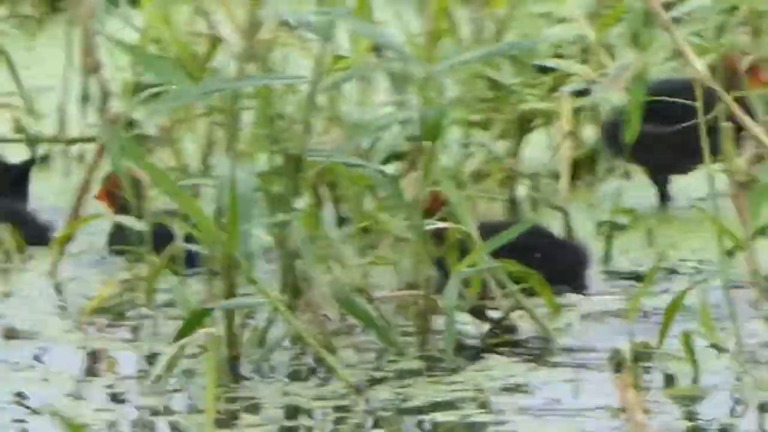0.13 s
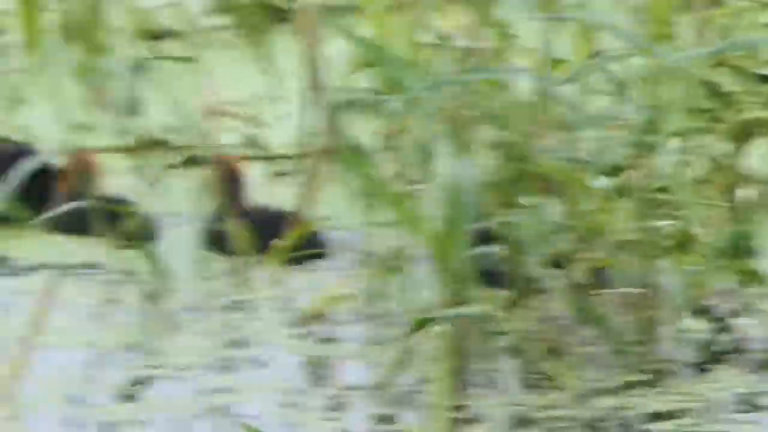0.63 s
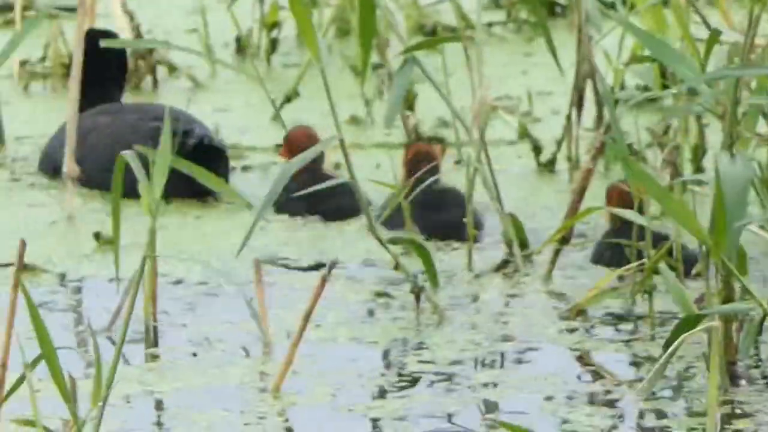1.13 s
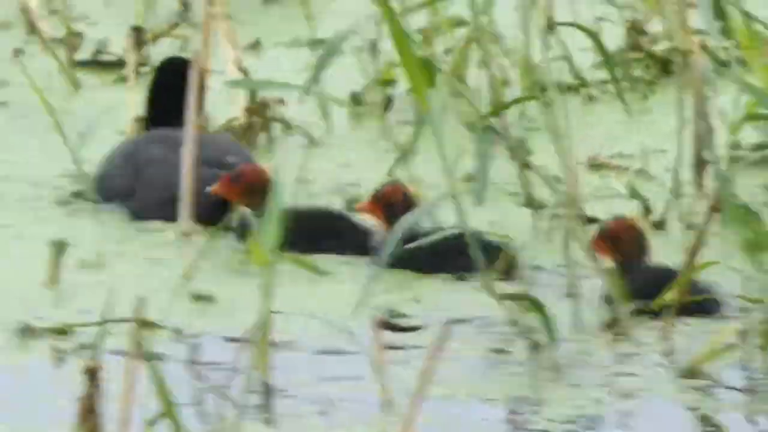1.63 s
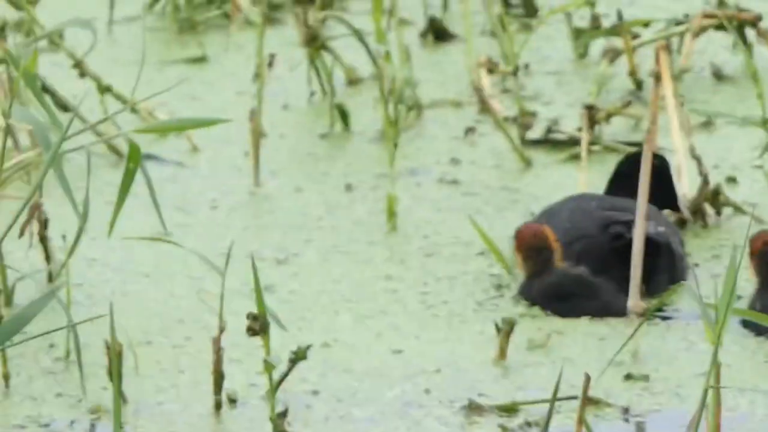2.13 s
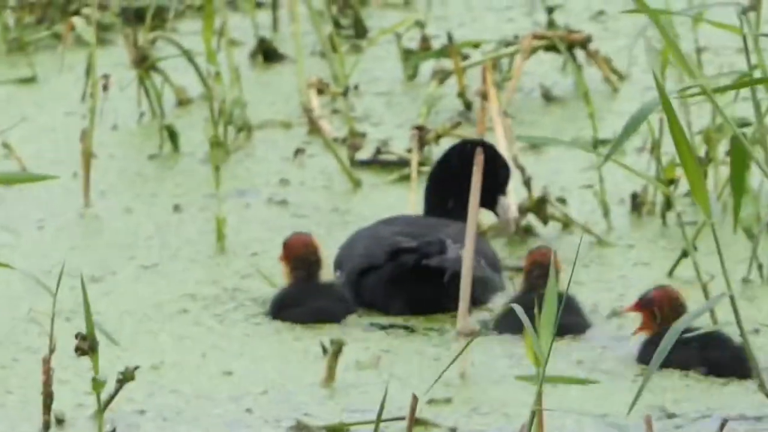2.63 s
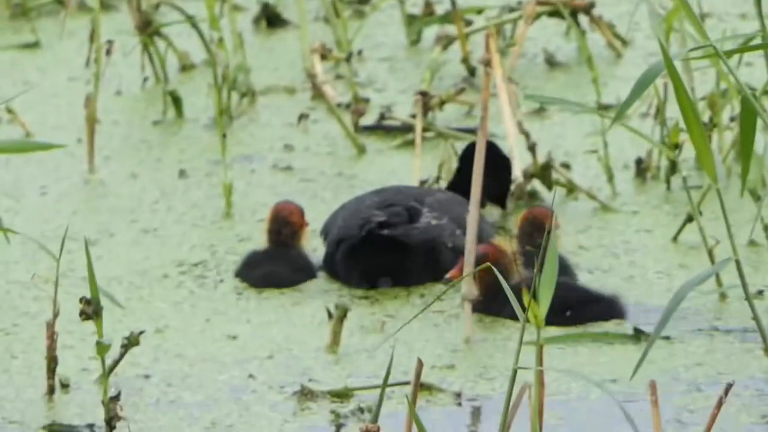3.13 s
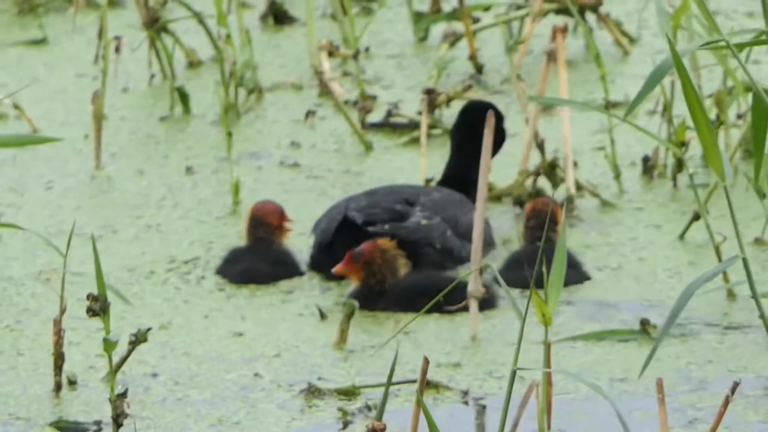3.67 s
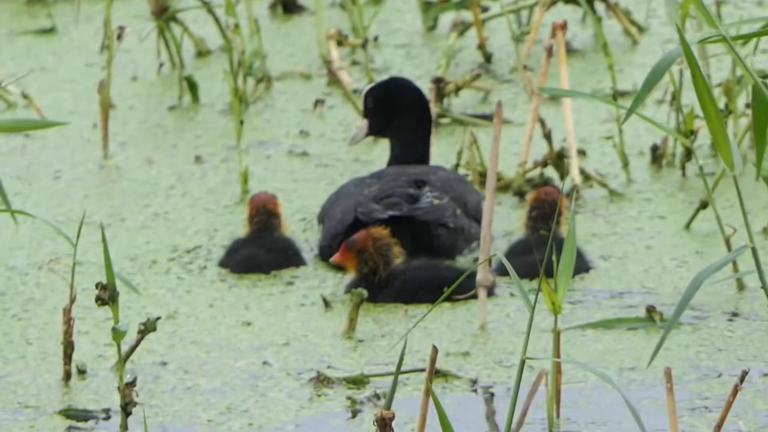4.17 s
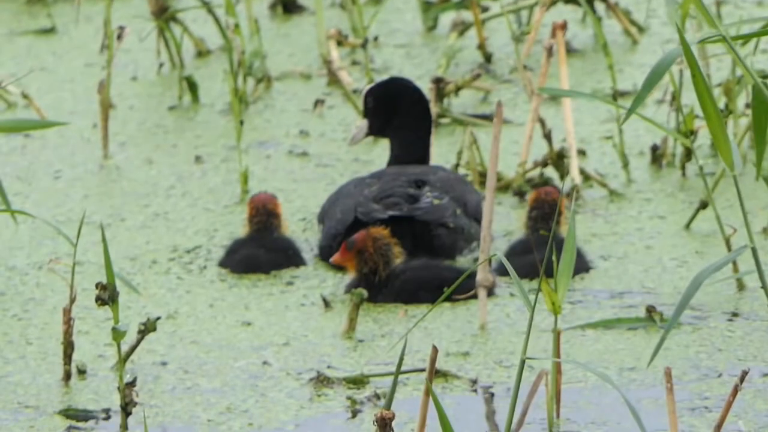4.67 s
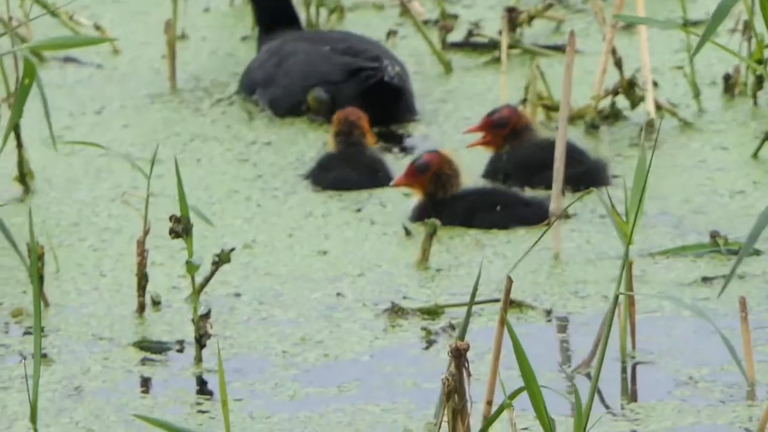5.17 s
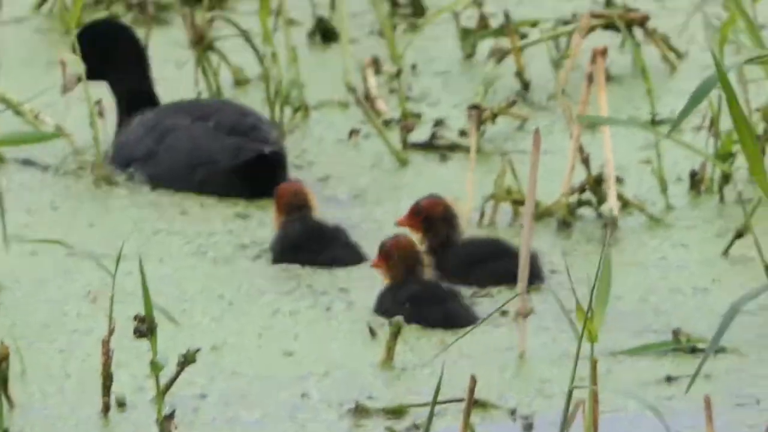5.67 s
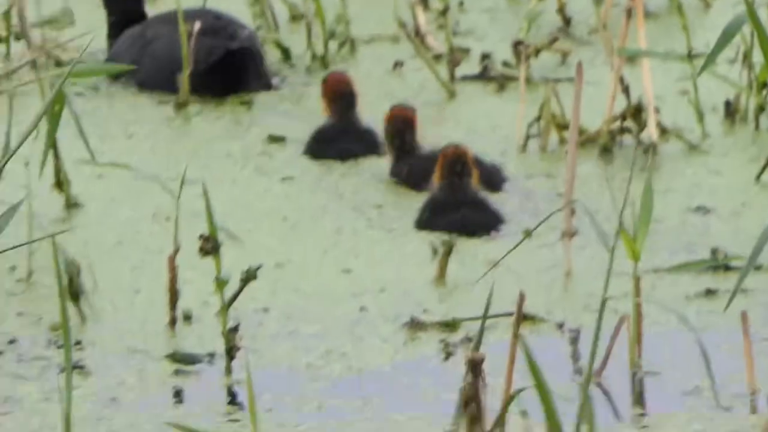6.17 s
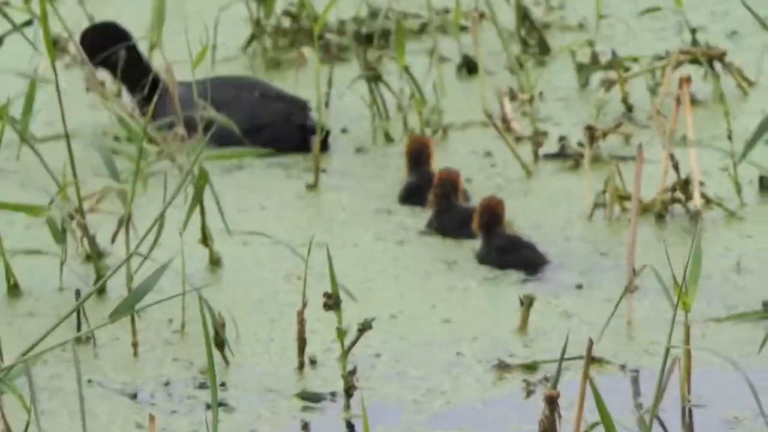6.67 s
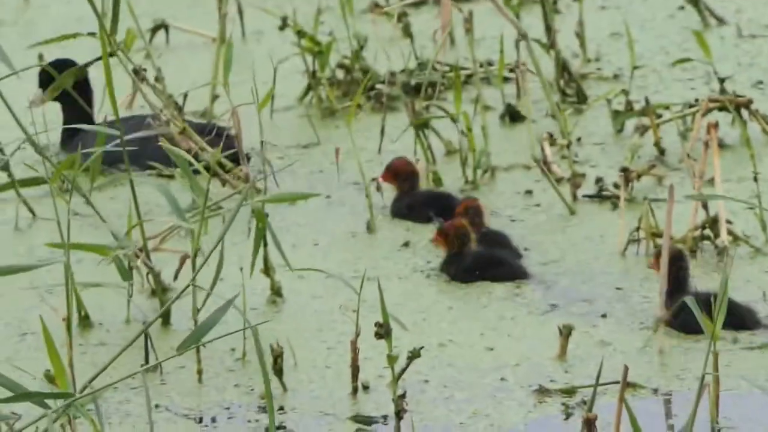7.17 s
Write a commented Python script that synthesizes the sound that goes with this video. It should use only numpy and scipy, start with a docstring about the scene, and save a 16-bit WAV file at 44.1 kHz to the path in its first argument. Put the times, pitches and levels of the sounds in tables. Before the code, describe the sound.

A dull, distant roar with light hiss and a thin wavering hum fills an open wetland. Small clicks come at 0.3 s and faint hoarse peeps at 0.5 and 0.7 s. A soft grunt and a clear arching chick whistle with a reedy undertone follow around 1.0-1.3 s, then another grunt at 1.6 s. Thinner, wavering cheeps come at 2.0-2.3 s and a brighter, rougher one at 2.7-3.1 s. Low rumble swells near 3.35 s. Reedy calls, a short whistle, a grunt and a tick cluster at 3.8-4.2 s. Sound cuts out at 4.2 s, leaving only minute crackles, and returns with a click at 4.95 s. Strong high whistles sound at about 5.3-5.6 and 5.8-6.0 s, with the loudest sharp click at 5.84 s. Weak peeps and a faint reedy call trail to 6.9 s; a tick at 7.0 s and one last faint cheep end it.

```python
"""A dull distant roar with a faint hum is heard first: shaped noise and a wavering sine.
Waterbird chicks then cheep among reeds: near-sine whistles arch up and down, reedier calls stack partials.
Short noise bursts click and tick now and then; soft grunts are noise through narrow resonances.
The sound is muted for most of a second, leaving a settling offset and runs of tiny spikes,
then fades back in with a click."""
import sys
import numpy as np
from scipy import signal
from scipy.io import wavfile
from scipy.ndimage import uniform_filter1d

SR = 44100
rng = np.random.default_rng(int(sys.argv[2]) if len(sys.argv) > 2 else 0)


def materialize(psi):
    """Save the field psi as 16-bit PCM at rate SR to the path in sys.argv[1].

    A 1-D psi becomes a single channel; in a 2-D psi each row is a channel.
    """
    bounded = np.clip(np.atleast_2d(psi).T, -1, 1)
    quanta = np.round(bounded * 32767).astype(np.int16)
    wavfile.write(sys.argv[1], SR, quanta)


def volts(x):
    """Linear amplitude factor 10**(x/20) for a level x in dB, scalar or array-like."""
    e = np.asarray(x, float) / 20
    return 10 ** e


N = 321930
TIME = np.arange(N) / SR
MUTE_S, BACK_S = 4.207, 4.955  # the mute shuts and reopens


def evened(x):
    """Normalization: scales a signal to unit rms."""
    return x / np.sqrt(np.mean(x ** 2) + 1e-20)


def read(points, hz):
    """Spectral envelope: interpolates a curve along log frequency."""
    f, value = np.transpose(points)
    return np.interp(np.log(hz + 1), np.log(f + 1), value)


def add(mix, s, sound):
    """Superposition: adds a sound to the mix from time s."""
    part = mix[round(s * SR):][:len(sound)]
    part += sound[:len(part)]


def resonate(x, hz, width):
    """Resonance of gain 1: shifts hz down to zero, smooths, and shifts back."""
    turn = np.exp(2j * np.pi * hz * np.arange(len(x)) / SR)
    r = np.exp(-np.pi * width / SR)
    smoothed = signal.lfilter([1 - r], [1, -r], x / turn)
    return 2 * (turn * smoothed).real


def swells(rows, t):
    """Level modulation: a sum of bell-shaped lifts in dB."""
    return sum(db * np.exp(-((t - s) / half) ** 2) for s, half, db in rows)


def wobble(count, size):
    """Low-pass random fluctuation of rms 1, smoothed twice over size samples."""
    once = uniform_filter1d(rng.standard_normal(count), size)
    return evened(uniform_filter1d(once, size))


def noise(field_db):
    """Spectral shaping: random short-time spectra under a dB field of bins x frames."""
    a, b = rng.standard_normal((field_db.shape[1], 513, 2)).T
    spectra = (a + 1j * b) * volts(field_db)
    return evened(signal.istft(spectra, nperseg=1024, noverlap=768)[1][:N])


def voice(rows, jitter, flutter_db):
    """Phase is the integral of frequency: start, phase, fluttering envelope and level columns of a call."""
    s, hz, *levels = np.transpose(rows)
    t = np.arange(s[0], s[-1], 1 / SR)
    pitch_hz = np.interp(t, s, hz) * (1 + jitter * wobble(len(t), size=90))
    phase = 2 * np.pi * np.cumsum(pitch_hz) / SR
    edge = np.clip(np.minimum(t - s[0], s[-1] - t) / .002, 0, 1)
    shape = np.sqrt(2) * edge * volts(flutter_db * wobble(len(t), size=200))
    return s[0], phase, shape, [np.interp(t, s, column) for column in levels]


def arch(crest, climb, fall, low_db):
    """Register break: adds the low-register climb before a crest and the slide after it."""
    foot_hz, break_hz, return_hz, foot_db = 2900, 3800, 3680, -5
    leap = crest[0][0] - .01  # s, where the pitch leaps up to the crest
    drop = crest[-1][0] + .018  # s, where it has dropped back
    rows = list(crest)
    if climb > 0:
        rows = [(leap - climb, foot_hz, low_db + foot_db), (leap, break_hz, low_db)] + rows
    if fall > 0:
        rows += [(drop, return_hz, low_db), (drop + fall, foot_hz, low_db + foot_db)]
    return rows


def whistle(rows, second_db, hoarse):
    """Near-sine tone: overtones peak near the top pitch; fast amplitude modulation makes it hoarse."""
    s, phase, shape, (level_db,) = voice(rows, jitter=.003, flutter_db=1.8)
    count = len(phase)
    hz = np.gradient(uniform_filter1d(phase, 400)) * SR / (2 * np.pi)
    effort_db = np.clip(.03 * (hz - hz.max()), -14, 0) + 2.5 * wobble(count, size=300)
    third_db = -9  # against the second partial
    overtones = np.sin(2 * phase) + volts(third_db) * np.sin(3 * phase)
    overtones *= volts(second_db + effort_db)
    breathy = .35  # weight of the wide-band part of the hoarseness
    rasp = 1 + hoarse * (wobble(count, size=80) + breathy * wobble(count, size=14))
    # a band of hiss just under the tone
    air = .7 * hoarse * wobble(count, size=36) * np.sin(.92 * phase)
    return s, shape * volts(level_db) * (rasp * (np.sin(phase) + overtones) + air)


def reedy(rows, open_s, half, fourth_db):
    """Harmonic series over a weak fundamental; the fourth partial comes out as the bill opens."""
    # partials 6, 7 and 8 against the second: level/dB
    buzz_db = [-24, -19, -21.5]
    # weak partials: multiple of the fundamental, partial followed (0-2 for 2, 3 or 4), level/dB against it
    weak_tones = [(1, 0, -9), (5, 2, -7)]
    s, phase, shape, (second_db, third_db) = voice(rows, jitter=.008, flutter_db=2.2)
    shut_db = -22  # fourth partial with the bill shut
    bill_db = shut_db - swells([(open_s, half, shut_db)], s + TIME[:len(phase)])
    levels = [second_db]
    for db in (third_db, fourth_db + bill_db):
        levels.append(db + 2.5 * wobble(len(phase), size=150))
    strong = sum(volts(db) * np.sin((k + 2) * phase) for k, db in enumerate(levels))
    buzz = sum(volts(second_db + db) * np.sin((k + 6) * phase) for k, db in enumerate(buzz_db))
    weak = sum(volts(levels[col] + db) * np.sin(k * phase) for k, col, db in weak_tones)
    return s, shape * (strong + buzz + weak)


def glide(start, length, from_hz, to_hz, db):
    """Linear frequency glide that swells, holds and fades."""
    # envelope of a glide: share of the length, level/dB
    envelope = [(0, -6), (.55, 0), (.8, 0), (1, -6)]
    return [(start + share * length, from_hz + share * (to_hz - from_hz), db + lift_db)
            for share, lift_db in envelope]


def far_note(rows):
    """Plain sine blurred by random frequency and amplitude modulation."""
    s, phase, shape, (level_db,) = voice(rows, jitter=0.018, flutter_db=4.5)
    return s, shape * volts(level_db) * np.sin(phase)


def reeds(x):
    """Multiple scattering: short decaying echoes off reeds and banks."""
    grid = np.arange(400, 12000, 20)  # samples of delay
    taps = np.zeros(12020)
    signs = rng.choice([-1., 1.], len(grid))
    taps[grid + rng.integers(0, 20, len(grid))] = signs * volts(-60 * TIME[grid] / .36)  # t60 .36 s
    leaves = .22  # flutter of the echoes off moving leaves
    flutter = evened(1 - leaves + leaves * wobble(N, size=60))
    echoes = signal.fftconvolve(x, taps / np.linalg.norm(taps))[:N]
    return x + volts(-11) * flutter * echoes


def bird_calls():
    """Superposition of whistles, peeps and side tones, reedy calls and far-off notes, without echoes."""
    # crest of each arched whistle, in the upper register: t/s, f/Hz, level/dB
    crests = [
        [(1.142, 4240, -45), (1.165, 4090, -50), (1.215, 4220, -45), (1.228, 4430, -44), (1.258, 4330, -48)],
        [(1.95, 4920, -67), (2.04, 4890, -55), (2.085, 4700, -59), (2.125, 4800, -66), (2.15, 4870, -59),
         (2.2, 4950, -59), (2.24, 4850, -62), (2.27, 4650, -72)],
        [(2.82, 4680, -53), (2.845, 4660, -60), (2.86, 4720, -51), (2.88, 4830, -46), (2.895, 4790, -49),
         (2.905, 4740, -59), (2.92, 4650, -51), (2.94, 4540, -48), (2.96, 4460, -53), (2.985, 4380, -48),
         (3.005, 4260, -57), (3.042, 4050, -59)],
        [(3.95, 3980, -56), (3.966, 4120, -53), (3.98, 4240, -58), (3.995, 4340, -57), (4.008, 4320, -63)],
        [(5.355, 4520, -52), (5.4, 4690, -46), (5.47, 4520, -42), (5.5, 4490, -40), (5.535, 4540, -42),
         (5.565, 4450, -42), (5.595, 4200, -53)],
        [(5.79, 4540, -52), (5.825, 4720, -56), (5.84, 4800, -62), (5.855, 4880, -45), (5.872, 4990, -39),
         (5.89, 4900, -40), (5.93, 4925, -38), (5.97, 4960, -39), (5.982, 4880, -48), (5.992, 4820, -62),
         (6.0, 4700, -54), (6.008, 4200, -63), (6.02, 3600, -68)],
        [(7.294, 4450, -60), (7.3, 4520, -60)],
    ]
    # one row a whistle: climb/s, slide/s, low register level/dB, second partial/dB, hoarseness 0-1
    timbres = [(.13, .125, -53, -26, .08), (0, 0, -60, -28, .2), (.15, .085, -53, -14, .16),
               (.045, 0, -54, -22, .25), (.095, .045, -59, -23, .03), (0, 0, -70, -40, .2),
               (.07, 0, -62, -25, .1)]
    # short hoarse peeps and brief side tones of the whistles: t/s, length/s, from f/Hz, to f/Hz, level/dB
    peeps = [(0.468, 0.22, 3480, 3750, -61), (.7, 0.13, 3780, 3870, -59.5),
             (1.419, 0.0335, 2902, 2950, -51), (2.098, .09, 3180, 3330, -56.5),
             (3.054, 0.014, 3730, 3640, -54), (3.971, 0.02, 4530, 4800, -61),
             (3.987, 0.025, 4800, 4200, -54), (4.015, 0.036, 4480, 4620, -62.5),
             (3.126, .045, 3700, 3610, -63), (5.407, 0.051, 5330, 5100, -59),
             (5.759, 0.036, 3720, 4020, -58.5), (6.07, 0.084, 3020, 3050, -64),
             (6.224, 0.18, 3020, 3000, -62.5), (6.763, 0.058, 2620, 3210, -60),
             (6.811, 0.069, 3230, 2618, -56.5)]
    # timbre of all these: second partial/dB, hoarseness 0-1
    peep_timbre = (-30, .3)
    # one table a reedy call: t/s, f/Hz, second partial level/dB, third partial level/dB
    reedy_calls = [
        [(1.11, 1776, -53.5, -76), (1.148, 1660, -55, -69), (1.2, 1390, -57, -85)],
        [(2.122, 1830, -56, -84), (2.13, 1840, -50, -84), (2.148, 1840, -52, -84), (2.168, 1830, -70, -84),
         (2.185, 1830, -57, -84), (2.2, 1820, -72, -84), (2.215, 1820, -50, -78), (2.225, 1720, -68, -74),
         (2.238, 1660, -50, -66), (2.244, 1620, -58, -65), (2.25, 1570, -49, -63), (2.26, 1560, -64, -66),
         (2.27, 1570, -48, -70), (2.28, 1540, -66, -80)],
        [(2.83, 1776, -62, -80), (2.85, 1800, -55, -78), (2.865, 1850, -64, -72), (2.882, 1900, -58, -54),
         (2.905, 1935, -53, -50), (2.922, 1910, -55, -53), (2.93, 1860, -66, -70), (2.94, 1760, -64, -51),
         (2.946, 1680, -53, -68), (2.96, 1540, -53, -76), (2.975, 1400, -58, -80)],
        [(3.82, 1930, -70, -85), (3.875, 2060, -60, -76), (3.9, 2125, -57, -80), (3.95, 2150, -64, -85)],
        [(3.99, 1790, -58, -82), (4.003, 1800, -52, -80), (4.024, 1840, -54, -78), (4.032, 1850, -66, -74),
         (4.05, 1870, -54, -60), (4.078, 1897, -49, -63), (4.1, 1875, -49, -66), (4.118, 1821, -52, -61),
         (4.136, 1694, -52, -53), (4.146, 1610, -55, -58), (4.16, 1478, -58, -70)],
        [(6.5, 1640, -63, -85), (6.56, 1800, -63, -80), (6.58, 1835, -74, -64), (6.6, 1845, -62, -59),
         (6.615, 1845, -74, -64), (6.635, 1840, -74, -72), (6.645, 1840, -74, -63), (6.655, 1840, -76, -72),
         (6.665, 1840, -78, -63), (6.69, 1835, -80, -67), (6.715, 1830, -82, -72)],
    ]
    # opening of the bill in each reedy call: t/s, half length/s, fourth partial level/dB
    bill_openings = [(1.135, .035, -63), (2.25, .03, -78), (2.9, .065, -59), (3.86, .04, -78),
                     (4.075, .04, -62), (6.63, .05, -68)]
    # low far-off notes: t/s, length/s, from f/Hz, to f/Hz, level/dB
    far_notes = [(2.147, 0.075, 1656, 1622, -52.5), (5.537, 0.09, 1630, 1674, -53)]
    birds = np.zeros(N)
    for crest, (climb, fall, low_db, second_db, hoarse) in zip(crests, timbres):
        add(birds, *whistle(arch(crest, climb, fall, low_db), second_db, hoarse))
    for row in peeps:
        add(birds, *whistle(glide(*row), *peep_timbre))
    for rows, opening in zip(reedy_calls, bill_openings):
        add(birds, *reedy(rows, *opening))
    for row in far_notes:
        add(birds, *far_note(glide(*row)))
    return birds


def tick(*band_dbs):
    """Noise burst in three resonant bands, each decaying fast; part of the treble is antiphase."""
    # knock, snap and fizz: f/Hz, width/Hz, t60/s
    bands = [(1104, 730, 0.048), (4200, 3800, 0.043), (10440, 3900, 0.0206)]
    t = TIME[:3000]
    bursts = rng.standard_normal((len(t), 4)).T * np.clip(t / 0.00179, 0, 1)
    bursts *= 1 + 0.52 * np.exp(-t / 0.00064)  # the onset is the sharpest
    bursts *= 1 - .6 * np.cos(2 * np.pi * t / .0028)  # it chatters every 2.8 ms
    parts = []
    # the fourth burst shares the top band
    for burst, db, (hz, width, t60) in zip(bursts, band_dbs + band_dbs[-1:], [*bands, bands[-1]]):
        ring = resonate(resonate(burst, hz, width), hz, width)
        parts.append(evened(ring) * volts(db - 60 * t / t60))
    low, middle, top, unlike = parts
    return low + middle + top, 0.4 * unlike


def ticks():
    """Superposed transients, as a shared signal and one that differs between the microphones."""
    # short clicks and ticks, one of them the mute reopening:
    # t/s, knock level/dB, snap level/dB, fizz level/dB
    tick_rows = [(0.318, -35, -44, -66.5), (0.369, -54, -47, -43), (0.969, -41, -46, -75),
                 (1.424, -35, -45, -53.5), (1.8296, -34, -59, -47), (1.9094, -61, -58, -56.5),
                 (1.9692, -37, -58, -49), (2.4613, -36.5, -56, -65.5), (3.1824, -54, -59.5, -53),
                 (3.485, -52.5, -57, -64.5), (3.5647, -48, -53.5, -61), (3.8796, -59, -57.5, -66.5),
                 (4.0746, -31.5, -44, -62), (4.955, -47, -50, -39), (5.7275, -62.5, -63.5, -56.5),
                 (5.7333, -40.5, -52, -48), (5.8369, -24.5, -25, -34.5), (7.007, -35, -47, -38.5)]
    shared, side = np.zeros((2, N))
    for s, *band_dbs in tick_rows:
        both, unlike = tick(*band_dbs)
        add(shared, s, both)
        add(side, s, unlike)
    return shared, side


def grunt(level_db, hz, length):
    """Formant filtering: a puff of noise through three narrow rings."""
    # share of the top ring's frequency, level/dB
    ring_tones = [(.21, -6.5), (0.418, -6.5), (1, -2)]
    puff = rng.standard_normal(round(length * SR))
    rings = 0
    for share, db in ring_tones:
        ring = resonate(resonate(puff, share * hz, 79), share * hz, 79)
        rings = rings + volts(db) * evened(ring)
    return volts(level_db - 8.0) * rings * signal.windows.tukey(len(puff), .6)


def grunts():
    """A few soft low noise puffs, superposed."""
    # t/s, level/dB before a common 8 dB cut, top ring f/Hz, length/s
    grunt_rows = [(1.039, -25.5, 1023, 0.081), (1.644, -27.5, 1032, 0.039), (4.015, -32, 1020, 0.082)]
    out = np.zeros(N)
    for s, *row in grunt_rows:
        add(out, s, grunt(*row))
    return out


def thud():
    """Low-frequency pulse: a knock on the microphone body."""
    # t/s, peak level/dB, length/s
    s, peak_db, length = (4.037, -33.5, 0.009)
    out = np.zeros(N)
    add(out, s, volts(peak_db) * np.hanning(round(length * SR)))
    return out


def hum():
    """Sine with slow random frequency and amplitude modulation: a thin tone that wavers."""
    # the hum swells once: t/s, half length/s, lift/dB
    hum_swell = [(5.3, .65, 10)]
    turns = np.cumsum(981 + 3.0 * wobble(N, size=2000)) / SR  # around 981 Hz
    level_db = -57 + swells(hum_swell, TIME) + 2.5 * wobble(N, size=1500)
    return np.sqrt(2) * volts(level_db) * np.sin(2 * np.pi * turns)


def roar():
    """Broadband noise with a drifting spectrum; its colour differs after the mute."""
    # colour of the roar before and after: f/Hz, relative level/dB per Hz
    colour_before = [(29, -56), (50, -52.5), (108, -2), (203, 0), (371, -1.5), (615, -10.5), (1020, -3),
                     (1360, -7.5), (2110, -26), (2880, -19.5), (6090, -30.5), (7210, -29.5), (10100, -32),
                     (13200, -39), (16000, -47.5)]
    colour_after = [(29, -61.5), (50, -24.5), (193, 1), (450, -4), (630, -17), (950, -3), (1330, -9.5),
                    (1910, -24.5), (2490, -24), (3030, -26), (3410, -33), (6550, -42), (8000, -37.5),
                    (9870, -38), (14900, -47.5), (16000, -56.5)]
    # course of the roar: t/s, level/dB
    course = [(0.0, -40.5), (0.93, -40), (1.8, -37.5), (2.13, -38.5), (4.0, -39.5), (5.1, -42),
              (5.32, -40.5), (5.62, -37.5), (7.3, -36.5)]
    # colour of the hiss unlike in the two microphones: f/Hz, relative level/dB per Hz
    hiss_colour = [(5060, -27.5), (8600, -24), (8930, -8.5), (9600, -1.5), (13000, -5.5), (15300, -12.5),
                   (16300, -27.5)]
    # faint throbs of the roar: f/Hz, depth
    throbs = [(53, .08), (64, .07), (117, .06)]
    # the roar under 150 Hz swells and sinks: t/s, half length/s, lift/dB
    rumble_swells = [(1.5, 2.5, -1.5), (3.35, 0.21, 12.5), (5.3, 0.45, 3.5)]
    # a rustle near 2400 Hz comes and goes: t/s, half length/s, lift/dB
    rustle_swells = [(0, 1.5, 0.5), (5.8, 1.706, -11), (6.88, .25, 9)]
    # dips and rings of the microphone housing: f/Hz, width/Hz, lift/dB
    housing = [(6320, 513, -4.5), (2780, 276, 6), (7240, 460, 3)]
    # neutral level of the treble before and after the mute ends: level/dB
    treble_even_db = (-40.5, -37.5)

    hz = np.fft.rfftfreq(1024, 1 / SR)[:, None]
    t = np.arange(N // 256 + 5) * 256 / SR
    s, level_db = np.transpose(course)
    steady_db = np.where(t < BACK_S, *treble_even_db) - np.interp(t, s, level_db)
    grain = rng.standard_normal((len(t), 513)).T
    patches = evened(uniform_filter1d(uniform_filter1d(grain, 12, 0), 14, 1))
    # the colour changes inside the mute
    colour_db = np.where(t < MUTE_S + .3, read(colour_before, hz), read(colour_after, hz))
    rumble = 1 / (1 + (hz / 150) ** 4)
    treble = 1 / (1 + (2200 / (hz + 1)) ** 4)
    flicker_db = 1.0 * treble * wobble(len(t), size=3)  # random level flicker shared over the treble
    lift_db = rumble * swells(rumble_swells, t)
    lift_db += treble * steady_db  # the treble does not follow the course of the roar
    lift_db += np.exp(-((hz - 2400) / 450) ** 2) * swells(rustle_swells, t)
    lift_db += sum(db * np.exp(-((hz - f) / w) ** 2) for f, w, db in housing)
    throb = 1 + sum(depth * np.sin(2 * np.pi * (f * TIME + 0.24 * wobble(N, size=4000)))
                    for f, depth in throbs)
    course_db = np.interp(TIME, s, level_db)
    mid = noise(colour_db + lift_db + flicker_db + 1.025 * patches) * throb * volts(course_db)
    hiss_db, width_db = -70.5, -34  # width: share of the roar that differs between the microphones
    side = noise(read(hiss_colour, hz) + flicker_db) * volts(hiss_db)
    side += noise(colour_db + 16.0 * patches) * volts(course_db + width_db)
    return np.array([mid + side, mid - side])


def scene():
    """Linear superposition of the echoing birds, the unechoed short sounds and the background."""
    shared, side = ticks()
    unechoed = shared + grunts() + thud()
    return reeds(bird_calls()) + unechoed + np.array([side, -side]) + hum() + roar()


def settling():
    """Transient decay: a small offset drifts to zero under runs of soft spikes with short tails."""
    # course of the offset: t/s, full scale
    offset = [(4.22, -.0003), (4.42, 0), (4.51, .00006), (4.58, .00005), (4.68, 0)]
    # runs of spikes: from t/s, to t/s, count, nominal peak level/dB, up or down (1, -1)
    runs = [(4.267, 4.31, 5, -70.5, 1), (4.322, 4.422, 15, -70, 1), (4.45, 4.505, 5, -71, 1),
            (4.582, 4.676, 5, -75.5, -1)]
    t = TIME[:400]
    spike = t / 0.00024 * np.exp(1 - t / 0.000206)
    spike += 0.61 * np.exp(-t / 0.0023) * (1 - np.exp(-t / 0.00039))
    out = np.interp(TIME, *np.transpose(offset)) * (TIME > MUTE_S)
    for start, end, count, peak_db, way in runs:
        stray, size = rng.uniform(-1.9, 1, (count, 2)).T  # unevenness in time and level
        times = np.linspace(start, end, count) + stray * (end - start) / count
        for s, db in zip(times, peak_db + 4.5 * size):
            add(out, s, way * volts(db) * spike)
    return out


def low_pass(x):
    """Removes everything above the highest recorded frequency."""
    return signal.sosfilt(signal.butter(12, 16480, fs=SR, output="sos"), x)


def record(dry):
    """Band limiting by the microphone; the mute's gain shuts within a few ms and reopens with a fade."""
    # reopening: time after the mute t/s, gain level/dB
    fade_in = [(0, -12), (0.045, -3), (0.06, -4), (.15, 0)]
    microphone = signal.butter(3, [61.6, 17000], "band", fs=SR, output="sos")
    band = signal.sosfilt(microphone, dry)
    band = signal.sosfilt(signal.cheby2(12, 60, 16300, fs=SR, output="sos"), band)  # steep top edge
    since = np.maximum(TIME - MUTE_S, 0)
    linger_db = -28 - 700 * since  # the last of the sound dies more slowly
    shut_db = np.maximum(np.maximum(-9000 * since, linger_db), -200)
    after, fade_db = np.transpose(fade_in)
    gain_db = np.where(TIME < BACK_S, shut_db, np.interp(TIME - BACK_S, after, fade_db))
    mix = band * volts(gain_db) + settling()
    return low_pass(mix)


dry = scene()
out = record(dry)
materialize(out)
```